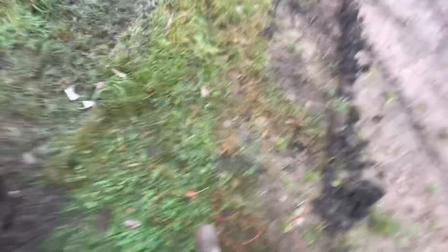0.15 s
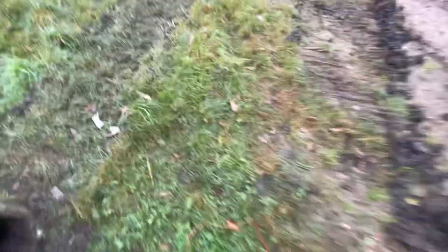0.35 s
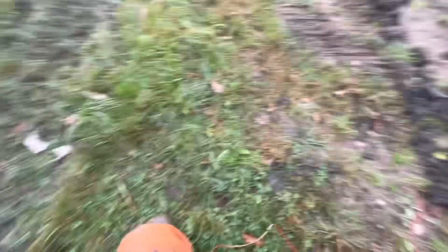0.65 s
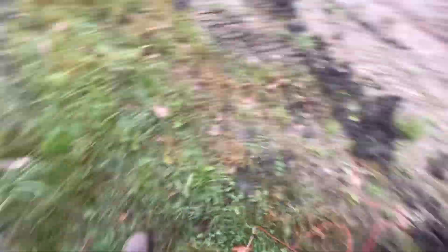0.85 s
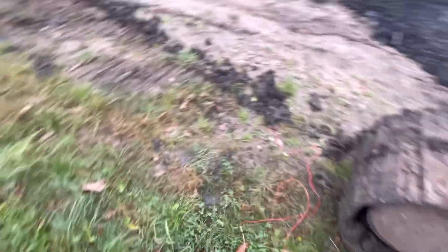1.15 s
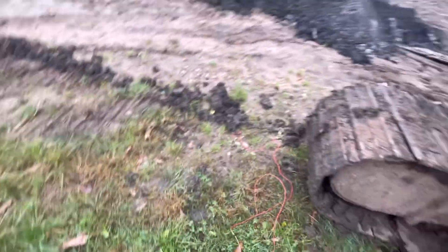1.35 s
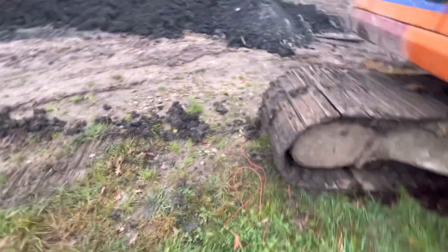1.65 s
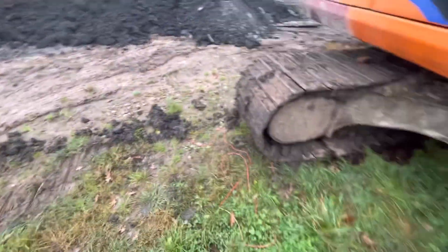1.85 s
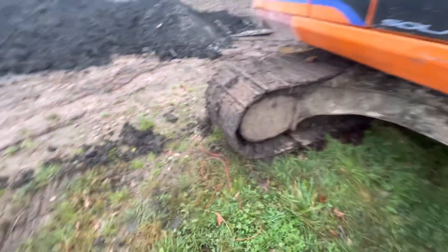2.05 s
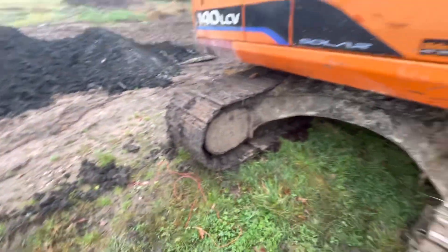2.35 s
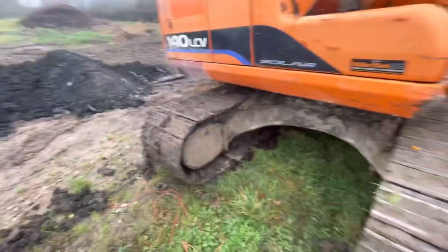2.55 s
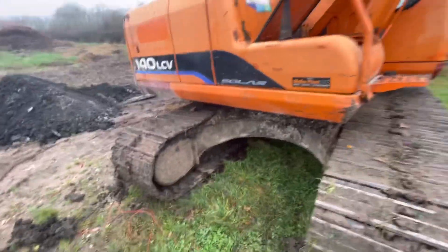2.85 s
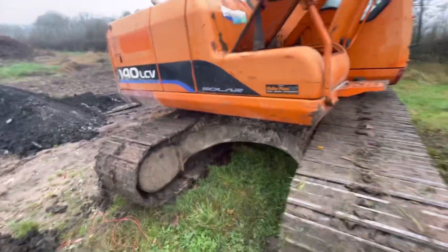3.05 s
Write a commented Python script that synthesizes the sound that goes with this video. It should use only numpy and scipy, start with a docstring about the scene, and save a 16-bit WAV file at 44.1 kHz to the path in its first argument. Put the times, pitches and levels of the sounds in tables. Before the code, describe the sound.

A six-cylinder excavator diesel idles evenly close by outdoors, low throb with metallic clatter and pump whine; faint steps swish and crunch on grass and grit, and wind bumps the handheld stereo microphone at the end.

```python
"""Outdoors, on grass and grit: a six-cylinder excavator diesel idles while someone walks up and turns to it.
Engine: noise and cycle-locked loops pulsed by the firings, plus sine orders for low hums and whine and struck rings.
An interaural delay swings it from right to left. Steps are grainy noise bursts: swish, rustle and crunch.
Air buffets are low noise bursts, short low thumps are decaying sines, and a thin hiss of filtered noise lies on top.
"""
import sys
import numpy as np
from scipy import signal
from scipy.fft import rfft, irfft
from scipy.io import wavfile
from scipy.ndimage import uniform_filter1d, map_coordinates

SR = 44100
rng = np.random.default_rng(int(sys.argv[2]) if len(sys.argv) > 2 else 0)


def master_out(mix):
    """Clip the mix to full scale and print it as 16-bit PCM to the path in sys.argv[1]."""
    frames = np.transpose(np.atleast_2d(mix))
    ceiling = np.clip(frames, -1, 1)
    pcm = np.round(ceiling * 32767).astype(np.int16)
    wavfile.write(sys.argv[1], SR, pcm)


N = 141120
T = np.arange(N) / SR
SIDES = np.array([[1], [-1]])  # left, right
CYCLE_HZ, CYLINDERS = 7.775, 6  # mean engine cycle rate


def from_db(db):
    """Decibels to amplitude gain."""
    return 10 ** (np.asarray(db) / 20)


def rms_one(x):
    """Scale to unit power."""
    return x / np.sqrt(np.mean(x ** 2) + 1e-20)


def in_time(rows):
    """Interpolate each column of a time table at every sample."""
    time_s, *columns = np.transpose(rows)
    return [np.interp(T, time_s, column) for column in columns]


def gains_at(points, hz):
    """Gain of a spectrum table, interpolated in dB over log frequency."""
    table_hz, db = np.transpose(points)
    return from_db(np.interp(np.log(hz + 1), np.log(table_hz), db))


def coloured(x, points):
    """Filter by a spectrum table; unit power."""
    hz = np.fft.rfftfreq(N, 1 / SR)
    return rms_one(irfft(rfft(x) * gains_at(points, hz), N))


def drift(rate_hz):
    """Random drift of unit power: white noise through a double-pole low-pass."""
    pole = np.exp(-2 * np.pi * rate_hz / SR)
    noise = rng.standard_normal(N + SR)
    # the first second lets the filter settle
    return rms_one(signal.lfilter([1], [1, -2 * pole, pole * pole], noise)[SR:])


def panned(x, left_minus_right_db):
    """Share the power between left and right."""
    gains = from_db(SIDES * left_minus_right_db / 2)
    return x * gains / np.sqrt(np.mean(gains ** 2, axis=0))


def ring_down(age_s, hz, t60_s):
    """A sine that falls 60 dB in t60."""
    return np.exp(-np.log(1000) * age_s / t60_s) * np.sin(2 * np.pi * hz * age_s)


def swells(rows, colour, likeness):
    """Gaussian-shaped bursts of coloured noise; likeness = power share common to both ears."""
    power = 0
    for time_s, half_s, db, side_db in rows:
        bell = np.exp(-.5 * ((T - time_s) / half_s) ** 2)
        power = power + panned(from_db(db) * bell, side_db) ** 2
    common = np.sqrt(likeness) * rng.standard_normal(N)
    separate = np.sqrt(1 - likeness) * rng.standard_normal((2, N))
    return np.sqrt(power) * coloured(common + separate, colour)


KNOCK_RISE_S, KNOCK_DECAY_S = 0.00025, 0.022  # time constants


def knocks(cycles, depth, cylinder_db):
    """Combustion envelope: each firing swells fast and dies away, at the strength of its cylinder."""
    firing = cycles * CYLINDERS
    age_s = firing % 1 / (CYLINDERS * CYCLE_HZ)
    cylinder = np.floor(firing).astype(int) % CYLINDERS
    strength = uniform_filter1d(from_db(cylinder_db)[cylinder], size=64)  # soften the steps
    pulse = rms_one((1 - np.exp(-age_s / KNOCK_RISE_S)) * np.exp(-age_s / KNOCK_DECAY_S))
    return rms_one(strength * (1 - depth + depth * pulse))


# relative spectrum of the engine's broad sound: (frequency [Hz], density [dB per Hz])
BODY_SPECTRUM = [(25, -22), (50, -11.5), (75, 6.5), (130, 1), (200, -0.5), (270, -1), (305, -5.5),
                 (410, -3), (490, -8.5), (605, -6), (665, -4.5), (830, -7), (1000, -1.5), (1350, -7.5),
                 (1580, -11), (1800, -15.5), (2200, -21), (2800, -20), (3300, -37), (5000, -40.5),
                 (5600, -44), (6600, -38.5), (7500, -47.5), (8500, -42), (9800, -49.5)]
BODY_DB = -28.5  # all registers together, before the register levels


def vibration(cycles, low_hz, high_hz, repeats):
    """One register of the block: a rattle repeated every engine cycle, plus fresh turbulence."""
    hz = np.fft.rfftfreq(N, 1 / SR)
    whole = gains_at(BODY_SPECTRUM, hz)
    band = whole * (hz >= low_hz) * (hz < high_hz)
    fresh = rms_one(irfft(rfft(rng.standard_normal(N)) * band, N))

    size = 32768  # samples in the one-cycle loop
    order_hz = np.arange(size // 2 + 1) * CYCLE_HZ
    lines = gains_at(BODY_SPECTRUM, order_hz) * (order_hz >= low_hz) * (order_hz < high_hz)
    # leave out the orders played as clean tones
    lines[[order for order, _ in ORDER_TONES] + [*HUM_ORDERS, *WHINE_ORDERS]] = 0
    phases = np.exp(2j * np.pi * rng.random(len(order_hz)))
    one_cycle = rms_one(irfft(lines * phases))
    looped = np.interp(cycles % 1 * size, np.arange(size), one_cycle)

    band_gain = from_db(BODY_DB) * np.sqrt(np.sum(band ** 2) / np.sum(whole ** 2))
    return band_gain * (np.sqrt(repeats) * looped + np.sqrt(1 - repeats) * fresh)


# strong multiples of the engine cycle, 36 and 54 = pump whine, before the register levels:
# (order [per cycle], RMS level [dB])
ORDER_TONES = [(32, -48), (34, -48), (36, -45), (42, -46), (43, -49), (44, -36.5), (48, -44.5), (50, -39),
               (51, -51.5), (52, -40), (54, -33), (55, -50), (56, -47), (57, -51), (58, -48), (85, -48),
               (93, -45.5), (94, -47.5), (123, -43), (126, -46.5), (130, -40), (136, -44.5), (142, -38.5),
               (148, -49), (163, -52.5), (166, -49.5), (199, -49.5)]


def tones(cycles, low_hz, high_hz, peak_at, looseness):
    """Clean orders of one register, wavering in level, phased to peak near one point of the cycle."""
    out = np.zeros(N)
    for order, db in ORDER_TONES:
        if low_hz <= order * CYCLE_HZ < high_hz:
            turns = order * (cycles - peak_at / CYLINDERS) + looseness * (rng.random() - .5)
            level = from_db(db + 0.94 * drift(0.81))
            out += np.sqrt(2) * level * np.cos(2 * np.pi * turns)
    return out


# parts rung once a cycle by valves and injectors, before rise, fade and register levels:
# (strike [firings], frequency [Hz], strike level [dB], t60 [s], time when clearest [s])
RINGS = [(-0.4, 1120, -28, 0.036, 1.9), (2.3, 710, -25.5, 0.067, 5), (1.07, 1545, -25, 0.11, 3.42),
         (0.7, 2760, -46, .08, 2.8), (2.4, 1820, -33.5, .08, 3.0), (3.5, 2230, -29.5, 0.011, 2.4),
         (3.1, 1200, -35, 0.019, 3.6), (4, 1030, -26, 0.12, 2.3), (4, 1980, -39, 0.013, 3.1),
         (3.5, 1400, -33, 0.061, 2.1), (5, 1123, -26.5, 0.036, 2.8), (5.0, 950, -32, .09, 2.5),
         (5.35, 2080, -34.5, 0.045, 2.0)]
RING_CHANCE_DB, RING_RISE_S = 1.5, 0.00053  # strike spread, rise time constant
RING_FADE_DB_PER_S, RING_FADE_MAX_DB = 6.5, 9.5


def rings(cycles, low_hz, high_hz):
    """Metal parts of one register, struck unequally once a cycle, each clearest at one point of the walk."""
    out = np.zeros(N)
    for firing, hz, db, t60_s, clearest_s in RINGS:
        if low_hz <= hz < high_hz:
            count, part = np.divmod(cycles + 2 - firing / CYLINDERS, 1)
            age_s = part / CYCLE_HZ
            chance_db = RING_CHANCE_DB * rng.standard_normal(size=64)[count.astype(int)]
            fade_db = np.minimum(RING_FADE_DB_PER_S * np.abs(T - clearest_s), RING_FADE_MAX_DB)
            rise = 1 - np.exp(-age_s / RING_RISE_S)
            out += from_db(db + chance_db - fade_db) * rise * ring_down(age_s, hz, t60_s)
    return out


def locked_sines(cycles, orders, levels):
    """Sines locked to the engine cycle, each with its own RMS level curve."""
    out = np.zeros(N)
    for order, db in zip(orders, in_time(levels)):
        out += np.sqrt(2) * from_db(db) * np.sin(2 * np.pi * (order * cycles + rng.random()))
    return out


# bearing of the engine: (time [s], left ear's delay behind the right [ms])
BEARING = [(0, 0.48), (.6, 0.57), (1.0, 0.61), (1.4, 0.46), (1.8, 0.38), (2.2, 0.19), (2.6, -0.094),
           (3.2, -0.13)]


def at_ears(source, share=1):
    """The nearer ear hears the machine first; share scales the delay between the ears."""
    delay_ms = share * in_time(BEARING)[0]
    heard_at_s = T - SIDES * delay_ms / 2000  # half to each ear, ms to s
    return map_coordinates(source, [heard_at_s * SR], order=3, mode="mirror")


# low throb orders, 6 = firing, 12 = its double, 13 = fan: (order [per cycle] x 3)
HUM_ORDERS = (6, 12, 13)
# level before the left-right balance: (time [s], order 6 [dB], order 12 [dB], order 13 [dB])
HUM_LEVELS = [(0, -31.5, -36, -32.5), (.5, -31.5, -43, -31), (.8, -29, -48, -27), (1.2, -30, -47, -30.5),
              (3.2, -30.5, -39, -31)]
HUM_LEFT_MINUS_RIGHT_DB, HUM_DELAY_SHARE = 3.5, 0.3025


def low_hums(cycles):
    """Steady low hums of firing and fan, with a reduced delay between the ears."""
    ears = at_ears(locked_sines(cycles, HUM_ORDERS, HUM_LEVELS), HUM_DELAY_SHARE)
    return from_db(SIDES * HUM_LEFT_MINUS_RIGHT_DB / 2) * ears


# pump and gear whine orders: (order [per cycle] x 3)
WHINE_ORDERS = (18, 72, 87)
# whine level along the walk: (time [s], order 18 [dB], order 72 [dB], order 87 [dB])
WHINES = [(0, -38.5, -35.5, -41), (.7, -47, -45.5, -55), (1.2, -47.5, -38.5, -39), (2.1, -43.5, -45, -45.5),
          (2.5, -34.5, -48, -56), (3.2, -37, -55, -60)]


def whines(cycles):
    """Pump and gears whine at fixed orders of the engine cycle."""
    return at_ears(locked_sines(cycles, WHINE_ORDERS, WHINES))


# registers: (top edge [Hz], share repeated each cycle [0-1], knock depth [0-1], scattered share [0-1],
# common tone peak [firings], phase looseness [0-1 turn])
REGISTERS = [(300.7, 0.27, 0.19, 0.14, 0, 0.65), (480, 0.72, 0.28, 0.14, 2.5, 0.58),
             (848, 0.75, 0.17, 0.4, 3, 0.85), (1204, 0.91, 0.4, 0.64, 4, 0.64),
             (1810, 0.84, 0.4, 0.46, 0.9, 0.59), (3170, 0.52, 0.5, 0.93, 0, 1),
             (9510, .05, 0.26, 0.97, 0, 1)]
# knock strength in firing order, one row per register: (strength [dB] x 6)
CYLINDER_DB = [(0.99, -1.5, -2, -0.5, 0.5, -0.23), (-0.28, -2.5, 0.5, -2, 3.5, 0.92),
               (1, -2, 1, -2.5, -5, -0.66), (0.19, -5.5, -9.5, 2.5, 4.5, 0.25),
               (-0.89, 0.5, 0.5, 0, -1, -1), (0.87, 3, 2.5, 1, 2, -0.15), (1, 3.5, 3.5, 2, 4, 1)]
# register gain along the walk: (time [s], bass [dB], drone [dB], low middle [dB], knock [dB],
# clatter [dB], tick [dB], hiss [dB])
REGISTER_LEVELS = [(0, -1.5, -4, 4, -7.5, 0.5, 2, 8.5), (.35, 0, -2.5, -0.5, -2.5, 0, -0.5, 4.5),
                   (.75, -2.5, -2, -3, -6, -5.5, -1.5, 6.5), (1.05, -1.5, 0.5, 2.5, -2, -1, 0, 1.5),
                   (1.3, 0, 3.5, 3, -3, 0, 1, 6.5), (1.7, 3, 1.5, 0.5, -1.7, 5, 0.5, 5.5),
                   (2.1, -0.6, 0, -2, -1.5, 6.5, 3, 5), (2.5, 1.5, -1, -1.5, -1, 2, 1.5, 3.5),
                   (2.8, 2, -1.5, -4.5, -2, -1, 0.5, 3.5), (3.2, 0, -2.5, -7.5, -4.5, -0.5, 0, 3.5)]
# register left minus right: (time [s], bass [dB], drone [dB], low middle [dB], knock [dB],
# clatter [dB], tick [dB], hiss [dB])
REGISTER_BALANCES = [(0, 2.5, 4, -6, 10.5, 1, 1, 9.5), (.6, -0.5, 8, -1.5, 0.5, 2, 2, 5.5),
                     (1.0, 8.5, -5, -4.5, -2.5, 3, -4, 3.5), (1.3, -3, 0, -1.5, 4.5, -1, -2.5, 2.5),
                     (1.7, -0.5, 1.5, 1.5, -10.5, 3, -2, 2), (2.4, -0.5, 5, -3, -1, 1, -2.5, 3.5),
                     (2.8, 1, 6, 9, 7.5, 4, 2.5, 3), (3.2, 11.5, 6, 11, 10, 4, 1, 5)]
FIRST_FIRING_S, SPEED_WANDER = 0.001963, 0.001203  # wander: relative spread of the speed


def engine():
    """Registers pulse with the firings, heard straight and scattered by ground and tracks."""
    speed = 1 + SPEED_WANDER * drift(2.28)
    cycles = CYCLE_HZ * (np.cumsum(speed) / SR - FIRST_FIRING_S)
    out = low_hums(cycles) + whines(cycles)
    low_hz = 10
    rows = zip(REGISTERS, CYLINDER_DB, in_time(REGISTER_LEVELS), in_time(REGISTER_BALANCES))
    for register, cylinder_db, db, balance_db in rows:
        high_hz, repeats, depth, scattered, peak_at, looseness = register
        beat = knocks(cycles, depth, cylinder_db)
        straight, left, right = [beat * vibration(cycles, low_hz, high_hz, repeats) for _ in range(3)]
        source = np.sqrt(1 - scattered) * straight
        source = source + tones(cycles, low_hz, high_hz, peak_at, looseness)
        source = source + rings(cycles, low_hz, high_hz)
        ears = at_ears(source) + np.sqrt(scattered) * np.array([left, right])
        out = out + from_db(db + SIDES * balance_db / 2) * ears
        low_hz = high_hz
    return out


# thin hiss at the very top: (time [s], level [dB])
TOP_HISS = [(0, -61), (.3, -68), (1.0, -69), (1.35, -66.5), (2.4, -67.5), (3.2, -76)]
# its relative spectrum: (frequency [Hz], density [dB per Hz])
TOP_COLOUR = [(7500, -39), (9800, -6.5), (11500, 1.5), (13000, 6), (14300, -2), (15700, -24)]


def top_hiss():
    """Faint centred noise in the highest treble, following a level curve."""
    return from_db(in_time(TOP_HISS)[0]) * coloured(rng.standard_normal(N), TOP_COLOUR)


# boots and clothes brush the grass: (time [s], half length [s], level [dB], left minus right [dB])
SWISHES = [(.183, 0.014, -32.5, 18), (.4, 0.043, -49.5, 8), (.56, 0.032, -50, 3), (1.07, 0.11, -50.5, 16)]
# relative spectrum: (frequency [Hz], density [dB per Hz])
SWISH_COLOUR = [(1200, -8), (2500, 3), (3500, 6.5), (5500, 1.5), (8300, 5), (10000, -11), (14000, -16),
                (16000, -33)]
# fine rustle of the walk: (time [s], half length [s], level [dB], left minus right [dB])
RUSTLES = [(.01, 0.017, -49, 10), (.16, .055, -51, 1), (.39, 0.042, -53, 1), (.85, 0.023, -53, 6),
           (1.08, .035, -51.5, 3), (1.21, 0.064, -52, 3), (1.4, 0.01, -52, 0), (1.51, 0.093, -54.5, 1),
           (2.025, 0.028, -55, 12), (2.025, 0.03, -55, 12)]
# relative spectrum: (frequency [Hz], density [dB per Hz])
RUSTLE_COLOUR = [(2000, -33), (4000, -3), (8500, 4), (10300, -6), (12500, 1), (14000, -11), (16000, -17)]
GRAIN_DB, GRAIN_RATE_HZ = 1.5, 110  # level spread, drift corner


def walk():
    """Steps through grass: noise swishes and rustles, roughened by one random grain."""
    grain = rms_one(from_db(GRAIN_DB * drift(GRAIN_RATE_HZ)))
    swishes = swells(SWISHES, SWISH_COLOUR, likeness=0.42)
    rustles = swells(RUSTLES, RUSTLE_COLOUR, likeness=0.38)
    return grain * (swishes + rustles)


# air on the microphone ports: (time [s], half length [s], level [dB], left minus right [dB])
BUFFETS = [(.2, .06, -29, 0), (2.66, 0.026, -27.5, -1), (3.03, 0.057, -25, 4), (3.14, 0.032, -23, 16)]
# relative spectrum: (frequency [Hz], density [dB per Hz])
BUFFET_COLOUR = [(20, -21), (50, 2), (80, 4.5), (160, -1.5), (320, -16.5), (600, -28), (2000, -71)]


def buffets():
    """Air turbulence at the ports: low noise bursts, mostly separate at each ear."""
    return swells(BUFFETS, BUFFET_COLOUR, likeness=0.12)


# short low thumps, a possible footfall then wind bumps, mostly left:
# (time [s], level before the sine levels [dB], left minus right [dB])
THUMPS = [(.378, -12, -10), (3.007, -14, 20), (3.117, -18.5, 11), (3.172, -14.5, 16)]
# sines of a thump: (frequency [Hz], relative level [dB], t60 [s])
THUMP_SINES = [(96, -1, 0.069), (178, -1.5, 0.039), (321, -7.5, 0.055)]


def thumps():
    """Each thump is three decaying low sines."""
    out = 0
    for time_s, db, side_db in THUMPS:
        age_s = np.maximum(T - time_s, 0)
        thump = np.zeros(N)
        for hz, sine_db, t60_s in THUMP_SINES:
            thump += from_db(db + sine_db) * ring_down(age_s, hz, t60_s)
        out = out + panned(thump, side_db)
    return out


# soles on soil and grit: (time [s], half length [s], level [dB], left minus right [dB])
CRUNCHES = [(.42, 0.04, -45.5, 4), (.99, 0.039, -43.5, 2), (1.11, 0.057, -43, 1), (1.62, 0.051, -46, -4)]
# relative spectrum: (frequency [Hz], density [dB per Hz])
CRUNCH_COLOUR = [(500, -14), (1200, -5), (2400, 8), (3300, -2.5), (7000, -25), (16000, -42)]
GRIT_DB, GRIT_RATE_HZ = 2.5, 50  # level spread, drift corner


def crunches():
    """Soil gives way under the soles: noise bursts roughened by a coarse random grain."""
    grit = rms_one(from_db(GRIT_DB * np.clip(drift(GRIT_RATE_HZ), -2, 2)))
    return grit * swells(CRUNCHES, CRUNCH_COLOUR, likeness=0.11)


def scene():
    """Sum of engine, hiss, steps, air buffets and low thumps."""
    return engine() + top_hiss() + walk() + buffets() + thumps() + crunches()


LOW_CUT_HZ, CUTOFF_HZ = 27, 15700


def record(dry):
    """The microphone drops the deepest rumble; the top is cut steeply."""
    low_cut = signal.butter(2, LOW_CUT_HZ, "high", fs=SR, output="sos")
    top_cut = signal.ellip(10, .1, 90, CUTOFF_HZ, fs=SR, output="sos")
    return signal.sosfilt(top_cut, signal.sosfilt(low_cut, dry))


dry = scene()
out = record(dry)
master_out(out)
```